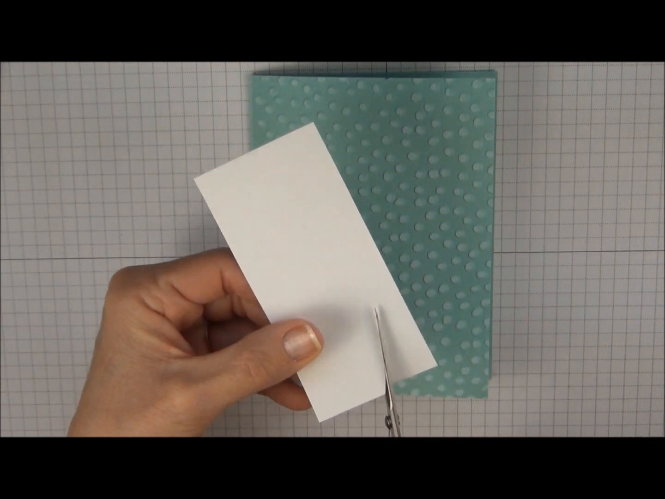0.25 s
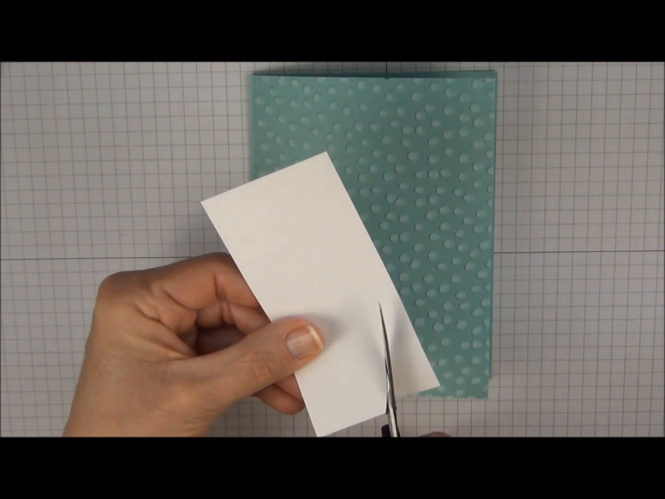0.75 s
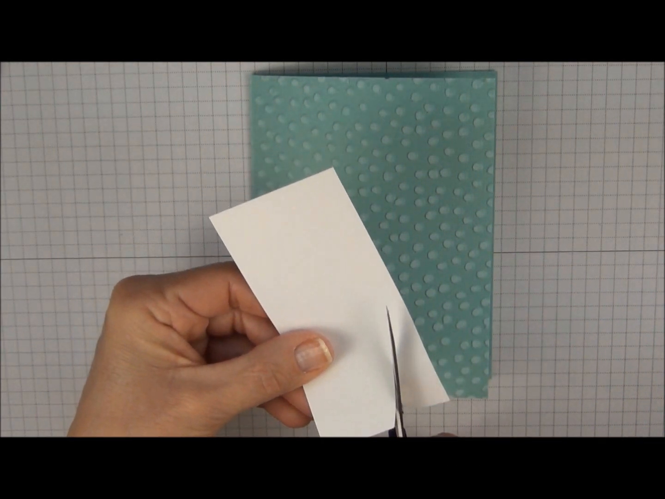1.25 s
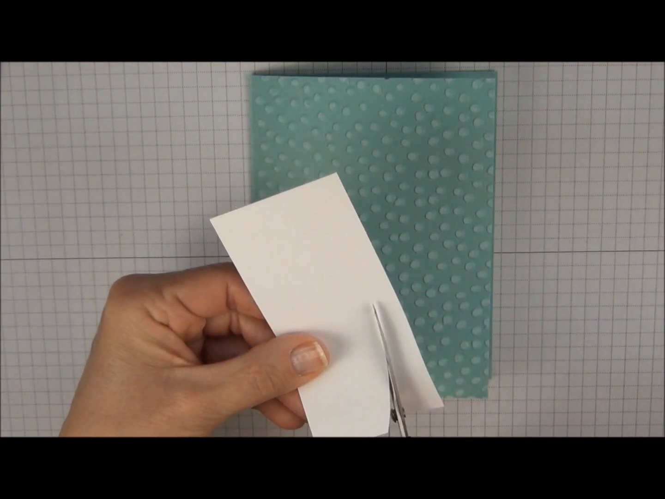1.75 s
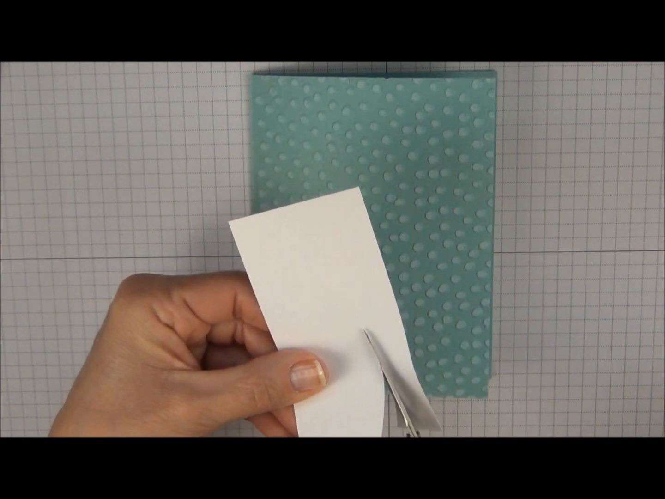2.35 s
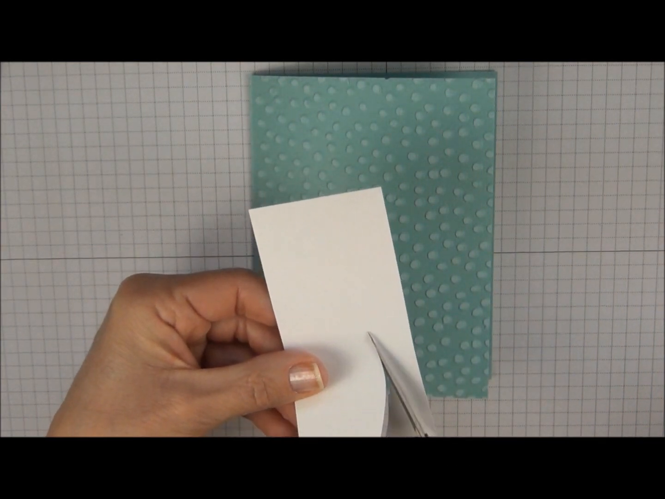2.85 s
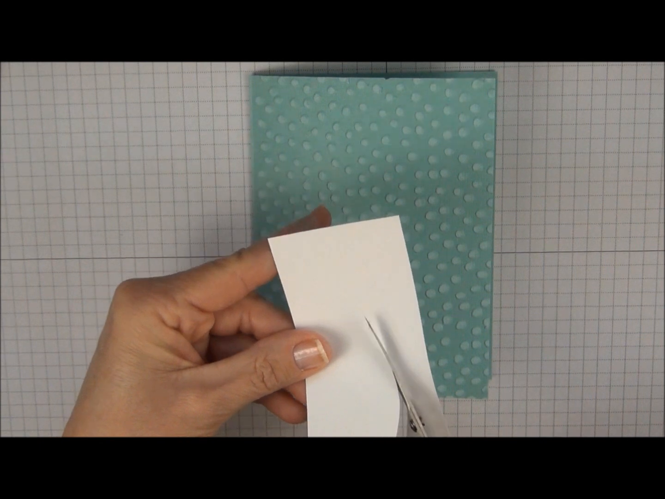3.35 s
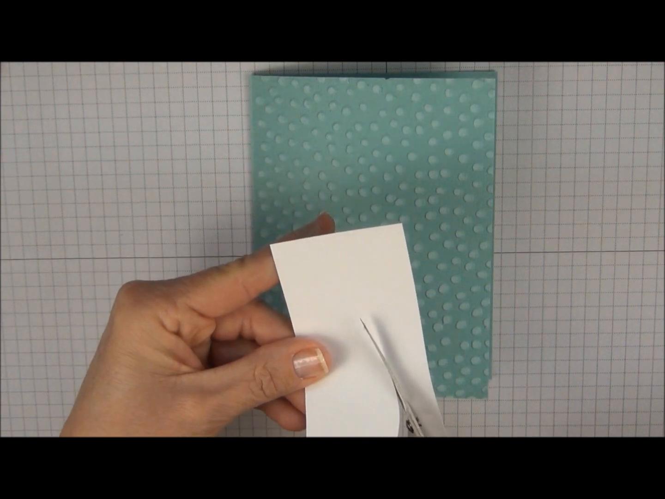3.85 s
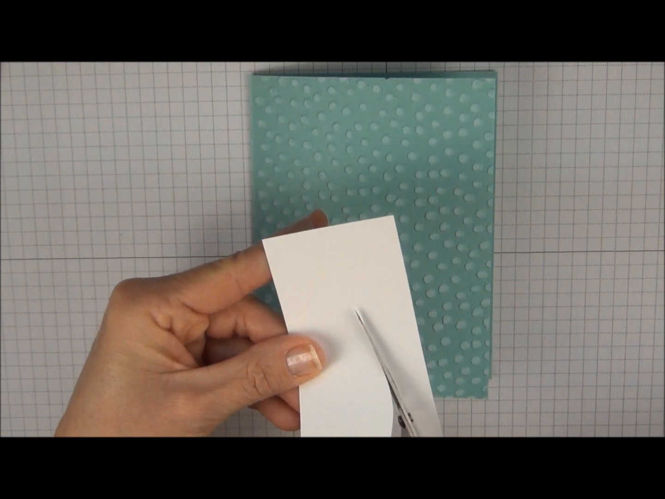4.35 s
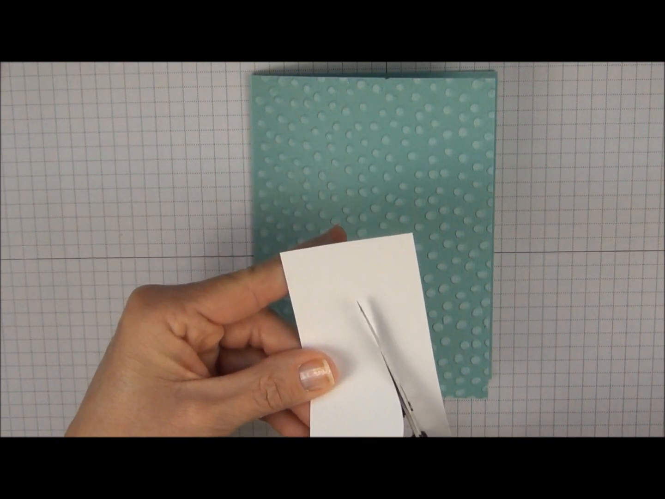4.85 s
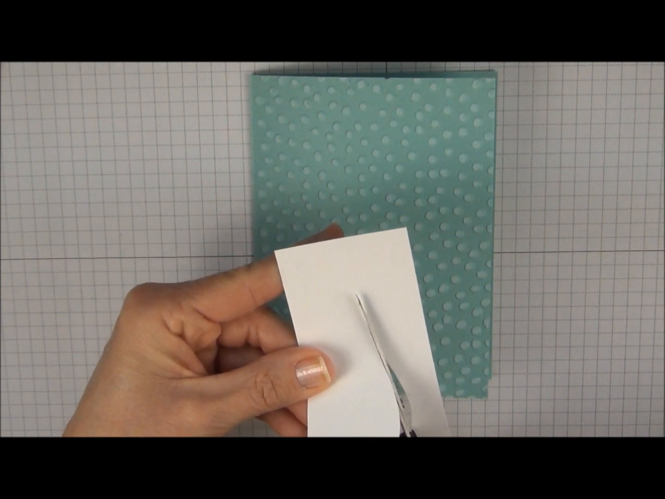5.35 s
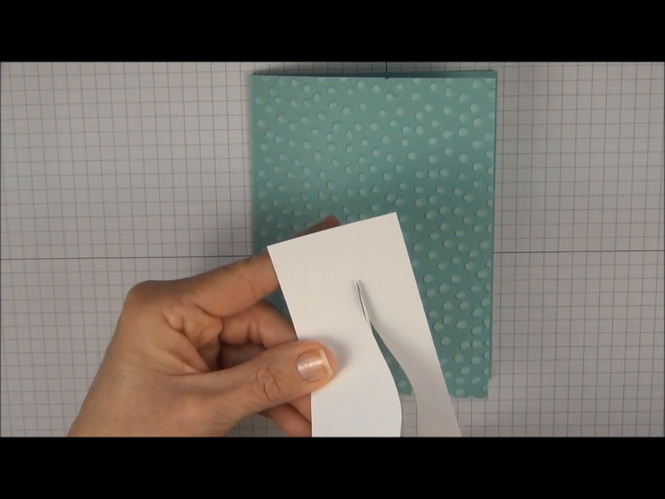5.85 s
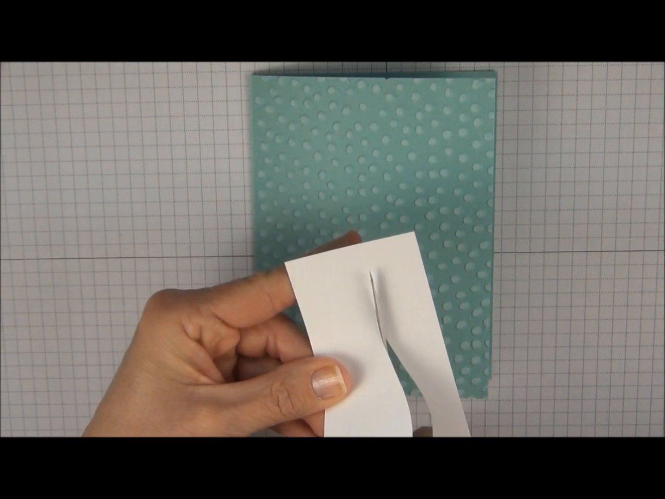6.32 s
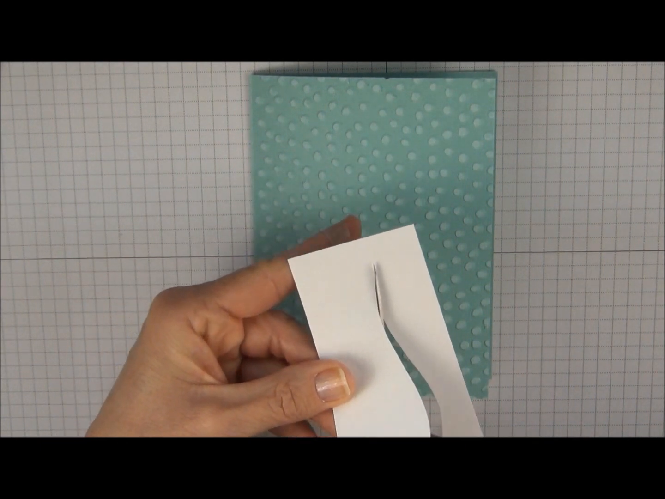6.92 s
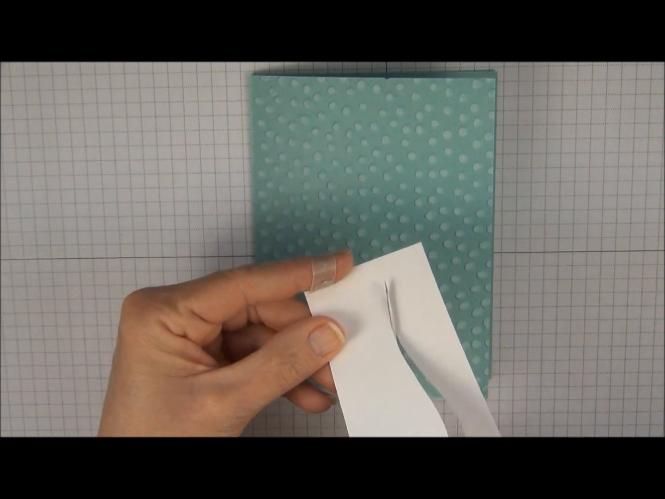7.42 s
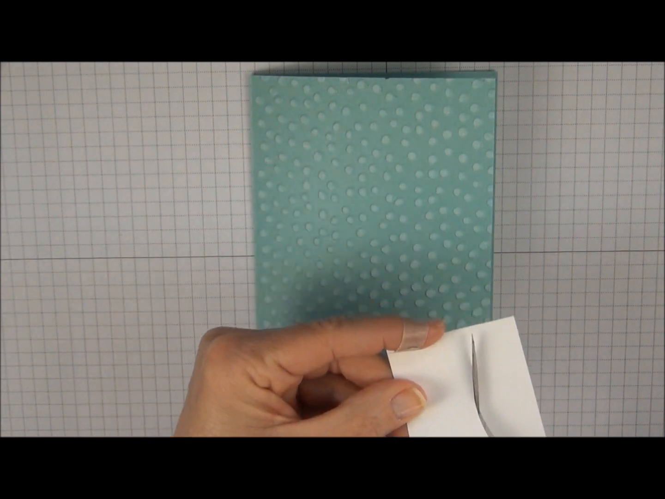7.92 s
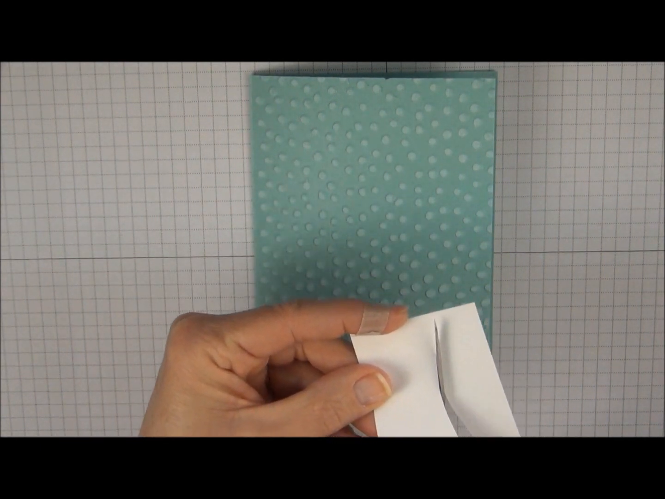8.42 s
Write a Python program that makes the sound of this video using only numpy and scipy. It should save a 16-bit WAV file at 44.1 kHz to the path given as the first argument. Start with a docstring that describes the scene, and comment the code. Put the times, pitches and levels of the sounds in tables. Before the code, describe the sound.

Small steel scissors cut stiff white card close to the microphone in a quiet indoor room. A brief snip opens, then the card slides and crinkles softly. Crisp, uneven crunching cuts follow in several bouts, with hissing card and small ticks between them as the grip shifts. A fan drones steadily underneath with faint electrical tones, low hum swells later, and a last small cut ends it.

```python
"""Small scissors cut stiff white card in a quiet room, over fan drone, room air and steady tones.
Cutting opens the scene: blades stick and slip, and each slip tears fibres that ring steel and card.
Then the card slides, crinkles and buckles; cutting follows from 1.4 s to 2.6 s and from 3.8 s to 5.7 s,
with a shift of grip between. A low hum swells after 5 s; past cutting at 6.4 s the card slides again, a
rumble grows, and cutting resumes at 8.5 s. A gain control ducks after loud snips and slowly recovers."""
import sys
import numpy as np
from scipy import signal
from scipy.fft import rfft, irfft, next_fast_len
from scipy.io import wavfile
from scipy.ndimage import uniform_filter1d, map_coordinates

SR = 44100
rng = np.random.default_rng(int(sys.argv[2]) if len(sys.argv) > 2 else 0)


def wav_out(sig):
    """Save sig, one row per channel (or a flat mono array), as 16-bit PCM at SR to the path in sys.argv[1]."""
    wavfile.write(sys.argv[1], SR, np.round(np.clip(np.atleast_2d(sig).T, -1, 1) * 32767).astype(np.int16))


N = 382788  # length in samples


def amp(db):
    """Level: decibels to linear gain."""
    return 10 ** (np.asarray(db) / 20)


def unit(x):
    """Normalisation: scale to an rms of 1."""
    return x / np.sqrt(np.mean(x ** 2) + 1e-20)


def along(points, hz):
    """Interpolation: read (Hz, value) points on a logarithmic frequency axis."""
    point_hz, value = np.transpose(points)
    return np.interp(np.log(hz + 1), np.log(point_hz + 1), value)


def wobble(rate):
    """Slow random modulation: a smooth curve through rate random knots a second."""
    knots = rng.standard_normal(int(N * rate / SR) + 4)
    return map_coordinates(knots, [np.arange(N) * rate / SR])


def during(spans):
    """Gating: 1 inside the spans and 0 outside, with soft edges."""
    t = np.arange(N) / SR
    inside = sum(1. * ((t > a) & (t < b)) for a, b, *_ in spans)
    return uniform_filter1d(inside, size=900)


def filtered(x, response):
    """Linear filtering: the spectrum of x times a response of frequency."""
    size = next_fast_len(N + 8192)
    spectrum = rfft(x, size) * response(np.fft.rfftfreq(size, 1 / SR))
    return irfft(spectrum, size)[..., :N]


def coloured(x, points):
    """Spectral colour: x shaped by a (Hz, dB) curve."""
    return filtered(x, lambda hz: amp(along(points, hz)))


def resonance(modes, hz):
    """Modal superposition: damped oscillators of alternating sign add up to one causal response."""
    total = 0
    for k, (centre, width, db) in enumerate(modes):
        mode = 1j * hz * width / (centre * centre - hz * hz + 1j * hz * width)
        total = total + (-1) ** k * amp(db) * mode
    return total


def fractures(rate, spread_db, size):
    """Random impulses: sparse breaks of log-normal strength and either sign, rate a second."""
    breaks = rng.random(size) < rate / SR
    return breaks * rng.choice([-1, 1], size) * amp(spread_db * rng.standard_normal(size))


# Colour of the room's air: pitch_hz [Hz], level_db [dB, relative]
AIR_COLOUR = [(15, -44), (25, -2.5), (145, -8), (439, -10), (476, -11.5), (516, -12), (560, -5.5),
              (887, -10), (1130, -9.5), (1230, -6.5), (2160, -28.5), (2760, -26), (2990, -17),
              (10400, -21.5), (16000, -26.5)]
# Side-to-mid ratio of the air: pitch_hz [Hz], ratio_db [dB]
AIR_WIDTH = [(60, -5), (180, -7), (550, -8), (1650, -16), (4970, -18), (15000, -21)]
# Resonances of the fan's casing: pitch_hz [Hz], width_hz [Hz], level_db [dB, relative]
CASING_MODES = [(141.5, 35, 1.5), (891, 62, 8), (1188, 20, -28), (1688, 340, -3), (4170, 330, -6),
                (7900, 210, -6)]
# Steady tones of fan and electronics: pitch_hz [Hz], level_db [dB rms, before the common tones_db]
STEADY_TONES = [(119, -63), (479.5, -58.5), (553.5, -59), (720, -64), (1200, -55.5), (2832, -60),
                (15735, -59)]
# Left-right balance of the whole background: pitch_hz [Hz], left_over_right_db [dB]
BALANCE = [(40, -11), (250, -2), (1500, -1.5)]


def background(air_db, casing_db, tones_db):
    """Broadband noise, resonance and pure tones: room air, a fan droning in its casing, hum and whine."""
    mid, side = rng.standard_normal((2, N))
    side = coloured(side, AIR_WIDTH)
    air = unit(coloured(np.array([mid + side, mid - side]), AIR_COLOUR))
    drone = unit(filtered(rng.standard_normal(N), lambda hz: resonance(CASING_MODES, hz)))
    t = np.arange(N) / SR
    tones = 0
    for hz, db in STEADY_TONES:
        phase = 2 * np.pi * hz * t + 0.083 * wobble(3.05)
        tones = tones + amp(db) * np.sqrt(2) * np.sin(phase)
    pair = amp(air_db) * air + amp(casing_db) * drone + amp(tones_db) * tones
    return filtered(pair, lambda hz: amp(np.outer([.5, -.5], along(BALANCE, hz))))


# Times when the low hum is stronger: start_s [s], end_s [s]
HUM_SWELLS = [(5.15, 5.87), (6.05, 7.44)]


def hum(hz, rest_db, swell_db, left_db):
    """Phase and amplitude modulation: a wavering low hum, stronger on the right, that swells twice."""
    tone = np.sqrt(2) * np.sin(2 * np.pi * hz * np.arange(N) / SR + 0.46 * wobble(5.9))
    swell = uniform_filter1d(during(HUM_SWELLS), size=SR // 3)
    right_db = 2
    return amp(rest_db + swell_db * swell + 1.8 * wobble(7)) * tone * amp([[left_db], [right_db]])


def rumble(hz, width_hz, end_db, rise_db_per_s):
    """Band-limited noise: a low rumble grows exponentially toward the end."""
    noise = unit(filtered(rng.standard_normal(N), lambda f: resonance([(hz, width_hz, 0)], f) ** 2))
    seconds_left = np.arange(N)[::-1] / SR
    return amp(end_db - rise_db_per_s * seconds_left) * noise


# Resonances: pitch_hz [Hz], width_hz [Hz], level_db [dB, relative]
EDGE_MODES = [(6630, 1050, -8), (7734, 556, 3.5), (8150, 810, 1.5), (9320, 860, -7.5), (11120, 1430, -12.5)]  # the cutting edge
BLADE_MODES = [(4194, 214, 4), (4550, 490, 0.5)]  # the blades themselves
BODY_MODES = [(2037, 119, -2), (2384, 210, -3.5), (2680, 140, 3), (2980, 790, -6)]  # the card's body
SHEET_MODES = [(466, 540, -20), (896, 71, 2.5), (1061, 70, 3), (1288, 91, 4), (1678, 280, -2.5)]  # the flexing sheet
# Colour of a breaking fibre: pitch_hz [Hz], level_db [dB, relative]
FIBRE_COLOUR = [(60, -16), (400, 5.5), (900, 1), (9000, -1), (12000, -8.5), (16000, -15)]


def snaps(rows, edge_db=0.8, blade_db=-4.5, body_db=-4.5, sheet_db=0, vary_db=0.78,
          onset=0.37, lead=0.0011, release=0.00096,  # onset is a share of the peak force; lead, release in s
          shift=0.022,  # spread of the resonances, in log frequency
          near_db=-5, near_t60=0.052, side_db=-20.0):  # weak copies; t60 in s
    """Modal excitation: bursts of breaking fibres ring edge, blades, card and sheet.

    Rows are (start_s, length_s, level_db, body_db, flex_db), the last two relative to level_db."""
    size, early = 2048, 256  # samples in a burst's window, and before its start
    t, hz = (np.arange(size) - early) / SR, np.fft.rfftfreq(size, 1 / SR)
    start, length, level_db, card_db, flex_db = np.transpose(rows)[:, :, None]
    # a few fibres give way first; the force builds during the burst, then lets go
    before = 0.4 * onset * np.exp(-np.abs(t) / lead)
    build = np.where(t < 0, before, onset + (1 - onset) * t / length)
    force = np.where(t < length, build, np.exp(-np.abs(t - length) / release))
    bursts = rfft(force * fractures(rate=7000, spread_db=5.5, size=force.shape))
    # mat and hands throw back weak copies, new for each burst
    decay = amp(-60 * np.arange(size) / SR / near_t60)
    copies = rng.standard_normal((2, *force.shape)) * decay
    copies_unit = copies / np.linalg.norm(copies, axis=-1, keepdims=True)
    paths = rfft(amp([near_db, side_db])[:, None, None] * copies_unit)
    paths[0] += 1  # direct sound, in the mid channel
    moved = hz * np.exp(shift * rng.standard_normal(start.shape))  # resonances shift from burst to burst
    rings = np.zeros(copies.shape)
    parts = [(EDGE_MODES, edge_db), (BLADE_MODES, blade_db + .5 * card_db),
             (BODY_MODES, body_db + card_db), (SHEET_MODES, sheet_db + flex_db)]
    for modes, db in parts:
        ring = irfft(bursts * paths * resonance(modes, moved))
        ring /= np.linalg.norm(ring[0], axis=1, keepdims=True)
        varied_db = db + vary_db * rng.standard_normal(start.shape)
        # a burst's level is its energy spread over 5 ms
        rings += amp(level_db + varied_db) * ring * np.sqrt(.005 * SR)
    index = np.abs(np.round((start + t) * SR)).astype(int).ravel()
    mid, side = [np.bincount(index, part.ravel(), N)[:N] for part in rings]
    return coloured(np.array([mid + side, mid - side]), FIBRE_COLOUR)


# Stretches of cutting, each with its own colour; one closing may span several:
# start_s [s], end_s [s], chatter_level_db [dB], body_db [dB, relative card body],
# flex_db [dB, relative sheet flex]
STRETCHES = [(0, 0.063, -44, -5.5, -10.5), (1.373, 1.54, -37.5, 0, -13.5), (1.67, 1.951, -27, 2.5, -12),
             (1.987, 2.298, -42, -3.5, -21), (2.37, 2.607, -33, -3.5, -15.5), (3.755, 4.084, -34, -3, -13),
             (4.118, 4.356, -51, -1, -16.5), (4.97, 5.24, -36, -2.5, -16.5),
             (5.257, 5.74, -45, -3.5, -16.5), (6.38, 6.713, -56, -3.5, -12), (8.53, 8.684, -47.5, -4, -13)]


def stretch_at(s):
    """Nearest neighbour in time: the columns of the stretch of cutting closest to each moment."""
    stretches = np.array(STRETCHES)
    outside = np.maximum(stretches[:, 0] - s[:, None], s[:, None] - stretches[:, 1])
    return stretches[outside.argmin(axis=1)].T


# A slip at the reference level [dB] has its stretch's colour; a harder one rings card body and blades less
# against the edge. The brightening is what the card body loses [dB per dB].
REFERENCE_DB, BRIGHTENING = -20.5, 0.25


def slips(rows):
    """Stick-slip: the stretch sets how much the card rings, and harder slips are brighter."""
    s, length, level_db = np.transpose(rows)
    *_, card_db, flex_db = stretch_at(s)
    card_db = card_db - BRIGHTENING * (level_db - REFERENCE_DB)
    return snaps(np.column_stack([s, length, level_db, card_db, flex_db]))


def chatter(length, jitter, spread_db):
    """Repeated stick-slip: further slips follow one another at an uneven pace during the cutting."""
    gap = 0.032  # s
    beats = np.arange(0, N / SR, gap)
    late, loud = rng.standard_normal((len(beats), 2)).T
    s = beats + jitter * gap * late
    begin, end, level_db, *_ = stretch_at(s)
    rows = np.column_stack([s, np.full(len(s), length), level_db + spread_db * loud])
    return slips(rows[(s > begin) & (s < end)])


def crackle(db, life):
    """Impulsive excitation: single fibres tick faintly on through the cutting."""
    ticks = np.abs(fractures(rate=70, spread_db=2.5, size=N))
    force = signal.lfilter([1], [1, -np.exp(-1 / (life * SR))], ticks)  # each tick dies over life seconds
    modes = BODY_MODES + BLADE_MODES + EDGE_MODES
    ring = filtered(force * rng.standard_normal(N), lambda hz: resonance(modes, hz))
    return amp(db) * during(STRETCHES) * unit(coloured(ring, FIBRE_COLOUR))


# Distinct slips of the blades, weak to strong: start_s [s], length_s [s], level_db [dB]
DISTINCT_SLIPS = [(0.0094, 0.0033, -16.5), (0.0505, 0.0033, -24), (1.428, 0.009, -28.5),
                  (1.473, 0.006, -29.5), (1.5714, 0.00088, -21.5), (1.6193, 0.0011, -11),
                  (1.7664, 0.0062, -23), (1.8026, 0.0018, -22), (1.857, .006, -20), (1.89, 0.013, -22.5),
                  (1.9378, 0.0019, -19.5), (2.004, 0.011, -13.5), (2.03, .007, -18), (2.0835, 0.0013, -19),
                  (2.147, 0.0036, -13), (2.1627, .0033, -22), (2.1926, .007, -15.5), (2.2617, .0074, -13),
                  (2.2904, 0.0033, -23.5), (2.3895, 0.0033, -21), (2.4157, 0.0027, -15.5),
                  (2.439, .008, -17.5), (2.4885, 0.004, -13), (2.552, 0.0044, -16), (3.7576, 0.0041, -30),
                  (3.806, 0.0039, -28), (3.8482, 0.0054, -25), (3.8755, 0.0061, -24), (3.8963, 0.0048, -27),
                  (3.994, 0.0043, -25.5), (4.0254, 0.0027, -29), (4.0547, 0.004, -23),
                  (4.0767, 0.0073, -18.5), (4.1817, 0.0075, -15), (4.2263, 0.0037, -18),
                  (4.2453, .0045, -23.5), (4.3118, .0066, -15), (4.337, .003, -29.5), (4.971, 0.007, -26.5),
                  (4.9914, 0.01, -28), (5.0536, .004, -29.5), (5.0815, 0.0046, -29.5),
                  (5.125, .0043, -24.5), (5.1537, 0.0022, -29.5), (5.197, 0.0065, -15), (5.262, 0.002, -20),
                  (5.3077, 0.0021, -17.5), (5.3304, 0.0025, -25), (5.372, 0.0013, -14.5),
                  (5.4642, 0.0078, -14.5), (5.5378, .0005, -21), (5.6022, 0.00067, -9.5),
                  (5.6575, 0.0041, -8), (5.7097, .0054, -12), (6.38, 0.0018, -24), (6.444, 0.0055, -12.5),
                  (6.4757, 0.0038, -19), (6.5397, 0.0023, -15.5), (6.5963, 0.004, -11),
                  (6.634, 0.01, -22.5), (6.6578, 0.0053, -19), (6.684, 0.011, -14), (8.5385, 0.0032, -17),
                  (8.59, 0.0055, -18), (8.635, 0.007, -23), (8.657, 0.0077, -21)]


def distinct_slips():
    """Stick-slip: the blades let go, softly or hard, and each release tears a burst of fibres."""
    return slips(DISTINCT_SLIPS)


# The card slides along blades or fingers: start_s [s], length_s [s], level_db [dB],
# swell_db [dB over the stroke], body_db [dB, card body relative to the hiss]
SLIDING_STROKES = [(0.155, 0.16, -34.5, -9, -5), (0.374, 0.19, -33.5, -2.5, 0.5),
                   (0.781, 0.05, -41.5, -3, 4), (0.905, 0.18, -44.5, 8.5, -2), (1.619, 0.1, -35, -4.5, 3.5),
                   (2.832, 0.23, -43.5, 2.5, -5.5), (3.048, 0.17, -29.5, 2, -4), (3.227, 0.058, -34, 2, -1),
                   (3.315, 0.13, -32.5, -6.5, -2.5), (4.498, 0.11, -34.5, 9.5, -4.5),
                   (4.615, 0.15, -38, 0, -2.5), (5.868, 0.071, -26, 2, -11), (5.965, 0.074, -28, -4.5, -6),
                   (6.07, 0.047, -30, -10, -6.5), (6.818, 0.014, -23.5, -4.5, -7.5),
                   (6.87, 0.074, -43.5, 10, -4), (7.117, .015, -44.5, 0, 0), (7.18, 0.025, -40, -4, -3),
                   (7.239, 0.017, -29.5, -4.5, -3), (7.301, 0.05, -40.5, -1, 1),
                   (7.4, 0.018, -35, -2.5, -1), (7.491, .215, -37, -2.5, 1), (7.721, 0.1, -40.5, 4, -3)]
STROKE_ATTACK_SHARE, STROKE_RELEASE_S = 0.14, 0.02  # the rise takes a share of the stroke's length


def strokes(cutting_db):
    """Power addition of envelopes: strokes rise, swell or sag, and die; cutting blades rub faintly too.

    Returns the gains of hiss and card body."""
    t = np.arange(SR // 2) / SR
    rubbing = np.pad(amp(cutting_db) * during(STRETCHES), (0, SR))
    power = np.tile(rubbing ** 2, (2, 1))
    for s, length, level_db, swell_db, card_db in SLIDING_STROKES:
        rise = np.minimum(t / (STROKE_ATTACK_SHARE * length), 1)
        fall = np.exp(-np.maximum(t - length, 0) / STROKE_RELEASE_S)
        gain = rise * fall * amp(level_db + swell_db * np.minimum(t / length, 1))
        power[:, round(s * SR):][:, :len(t)] += np.array([gain, gain * amp(card_db)]) ** 2
    return np.sqrt(power[:, :N])


# The fingers shift their grip, away from the steel: start_s [s], end_s [s]
GRIP_SHIFTS = [(2.8, 3.6), (7.05, 9.5)]
# Colours of the card hissing on skin and scraping on steel: pitch_hz [Hz], level_db [dB, relative]
SKIN_COLOUR = [(4000, -28.5), (5700, -4), (6550, -2), (7200, -1.5), (8100, 3.5), (10000, -8), (11000, -19),
               (16000, -39)]
STEEL_COLOUR = [(4000, -19.5), (6700, -1), (8100, 3), (9100, -3.5), (9700, -9), (12500, -19), (16000, -36)]
# a brisk stroke fizzes higher up: level relative to a hiss at the reference level, growth in dB per dB
FIZZ_HZ, FIZZ_WIDTH_HZ, FIZZ_DB, FIZZ_GROWTH = 9900, 1100, -10.5, 2.04


def slide(hiss_db, body_db, sheet_db, steel_db, skin_db, catch_db, side_db):
    """Sliding friction: dense tiny catches of the card's grain hiss and ring the card unevenly."""
    hiss_gain, card_gain = strokes(cutting_db=-57)
    mid, side = fractures(rate=8000, spread_db=3.5, size=(2, N))
    grain = np.array([mid + amp(side_db) * side, mid - amp(side_db) * side])

    def rung(modes):
        """Forced vibration: the grain rings a set of modes."""
        return unit(filtered(grain, lambda hz: resonance(modes, hz)))

    pressure = unit(amp(catch_db * wobble(260) + 1.3 * wobble(45)))
    on_skin = during(GRIP_SHIFTS)
    skin_hiss = on_skin * unit(coloured(grain, SKIN_COLOUR))
    steel_hiss = (1 - on_skin) * unit(coloured(grain, STEEL_COLOUR))
    hiss = amp(hiss_db) * (skin_hiss + steel_hiss)
    # the blades sing when the card scrapes along them, less when it slides on skin
    blades = amp(steel_db + skin_db * on_skin) * rung(BLADE_MODES)
    card = amp(body_db) * rung(BODY_MODES) + amp(sheet_db) * rung(SHEET_MODES)
    contact = unit(amp(2.1 * wobble(22)))  # the ringing varies as the contact wanders over the card
    fizz = unit(filtered(grain, lambda hz: resonance([(FIZZ_HZ, FIZZ_WIDTH_HZ, 0)], hz) ** 2))
    fizz_gain = amp(REFERENCE_DB + FIZZ_DB) * (hiss_gain / amp(REFERENCE_DB)) ** FIZZ_GROWTH
    return pressure * (hiss_gain * hiss + fizz_gain * fizz + card_gain * contact * (card + blades))


# The bent card crinkles: start_s [s], length_s [s], level_db [dB], body_db [dB, relative card body]
CARD_CRINKLES = [(0.2455, 0.0063, -21, -0.5), (0.487, 0.0088, -32.5, 9.5), (0.56, 0.0064, -27, 0),
                 (0.7816, 0.0012, -25, 3), (1.1533, 0.0015, -24.5, 7), (1.6184, 0.0024, -23, 17),
                 (1.6222, 0.0096, -16.5, 9), (2.6043, 0.0025, -25, 4.5), (2.66, .002, -30.5, 3.5),
                 (2.6957, 0.011, -22.5, 2), (2.719, 0.00065, -25, 3.5), (2.7275, 0.0018, -18.5, -11),
                 (2.772, 0.0024, -26.5, 0.5), (2.866, .0014, -32, -3), (2.884, .003, -28, -17),
                 (4.597, 0.0077, -20.5, -2), (6.785, .0013, -34, -2), (6.906, 0.0015, -25.5, 0),
                 (6.948, 0.0041, -32.5, 4.5), (7.426, 0.00089, -40, 2), (7.826, 0.0011, -34.5, 5.5),
                 (8.279, 0.0073, -25.5, -4.5)]


def crinkles():
    """Brittle fracture: fibres snap in the bent card, and the whole sheet flexes with them."""
    flex_db = -6  # relative to each crinkle's level
    return snaps([(*row, flex_db) for row in CARD_CRINKLES])


# The whole card buckles: start_s [s], level_db [dB]
CARD_BUCKLES = [(0.782, -29.5), (1.621, -19), (4.551, -36), (4.601, -35), (7.427, -29), (8.295, -33)]
# Its bending modes: pitch_hz [Hz], level_db [dB, mean relative level], t60_s [s]
BENDING_MODES = [(237, -15, 0.1), (465, -5.5, 0.083), (808, 1.5, 0.053), (990, 0, 0.059),
                 (1280, -10, 0.054)]


def buckles(attack):
    """Snap-through buckling: the card pops over and its bending modes ring briefly."""
    t, out = np.arange(SR // 4) / SR, np.zeros(N + SR)
    for s, db in CARD_BUCKLES:
        ring = 0
        for hz, level, t60 in BENDING_MODES:
            decay = amp(level + rng.normal(0, 2.5) - 60 * t / t60)
            ring = ring + decay * np.sin(2 * np.pi * hz * t)
        out[round(s * SR):][:len(t)] += amp(db) * ring * (1 - np.exp(-t / attack))
    return out[:N]


# The room's decay: pitch_hz [Hz], t60_s [s]
ROOM_DECAY = [(200, 0.86), (2000, 0.38), (8000, 0.42), (15000, 0.064)]


def room(x, side_db):
    """Reverberation: convolution with a decaying, mostly mono noise tail whose top treble dies first."""
    hz, t, z = signal.stft(rng.standard_normal((2, SR // 2)), SR, nperseg=256)
    decay = amp(-60 * t / along(ROOM_DECAY, hz)[:, None])
    tail = signal.istft(z * decay, SR, nperseg=256)[1]
    tail *= np.minimum(np.arange(tail.shape[1]) / SR / 0.0031, 1)  # 3.1 ms rise
    mid, side = signal.fftconvolve(x[None], tail / np.linalg.norm(tail[0]), axes=1)[:, :N]
    return np.array([mid + amp(side_db) * side, mid - amp(side_db) * side])


def scene():
    """Superposition: scissors and card near the middle, with the room around them."""
    floor = background(air_db=-44.5, casing_db=-45.0, tones_db=-0.5)
    floor = floor + hum(hz=58.5, rest_db=-62.5, swell_db=15.5, left_db=-14)
    floor = floor + rumble(hz=138, width_hz=100, end_db=-49, rise_db_per_s=8.5)
    cut = distinct_slips() + crackle(db=-47.5, life=0.0012)
    cut = cut + chatter(length=0.0042, jitter=0.2, spread_db=5.5)
    rub = slide(hiss_db=0.0, body_db=-0.5, sheet_db=-4.0, steel_db=-1.5, skin_db=-5.5,
                catch_db=1.56, side_db=-34)
    card = rub + crinkles() + buckles(attack=0.0022)
    near = card + cut
    return near + amp(-19.5) * room(near.mean(axis=0), side_db=-12.0) + floor


# level that turns the gain down [dB], by how much at most [dB], and how fast it returns
CEILING_DB, RANGE_DB, RECOVERY_DB_PER_S = -18.5, 5, 2


def gain_control(x):
    """Dynamic range limiting: the gain drops for a sound over the ceiling and creeps back."""
    power = np.abs(uniform_filter1d(np.mean(x ** 2, axis=0), size=900))
    over_db = np.clip(10 * np.log10(power + 1e-12) - CEILING_DB, 0, RANGE_DB)
    recovered_db = RECOVERY_DB_PER_S * np.arange(N) / SR
    return x * amp(recovered_db - np.maximum.accumulate(over_db + recovered_db))


LOW_CUT_HZ, TOP_HZ = 40, 16000  # the microphone's bass roll-off and the upper band limit


def record(dry):
    """Band limiting: ride the gain, cut the deepest bass, clip at full scale, drop all above the top."""
    held = filtered(gain_control(dry), lambda hz: 1 - 1 / (1 + (hz / LOW_CUT_HZ) ** 4))
    return filtered(np.clip(held, -1, 1), lambda hz: hz < TOP_HZ)


dry = scene()
out = record(dry)
wav_out(out)
```